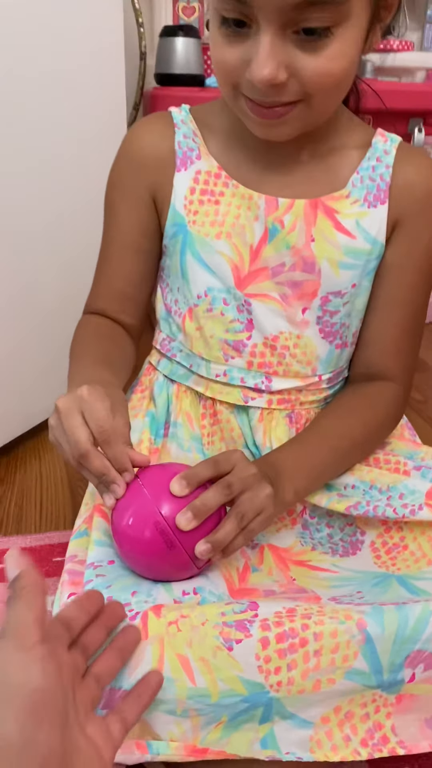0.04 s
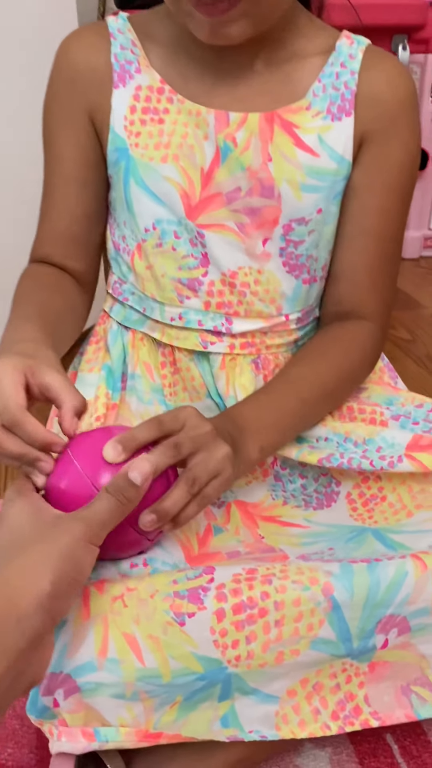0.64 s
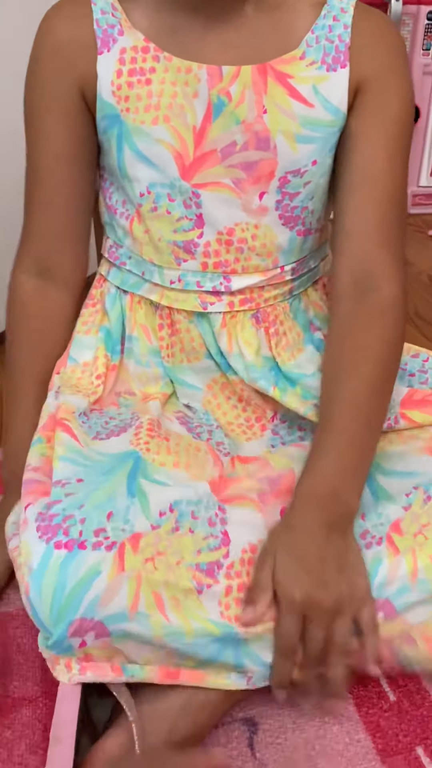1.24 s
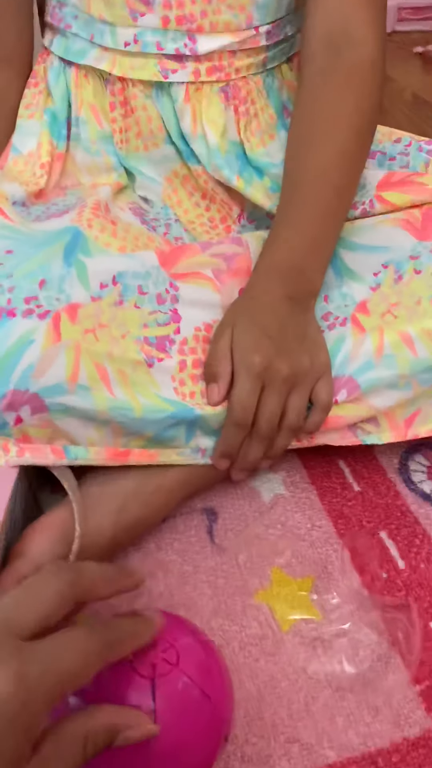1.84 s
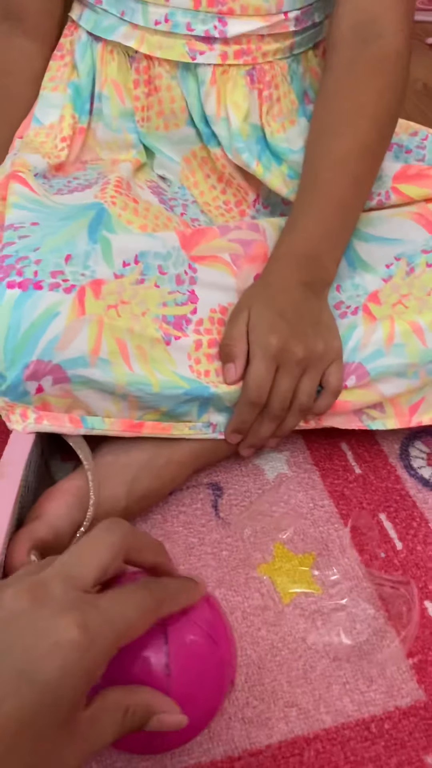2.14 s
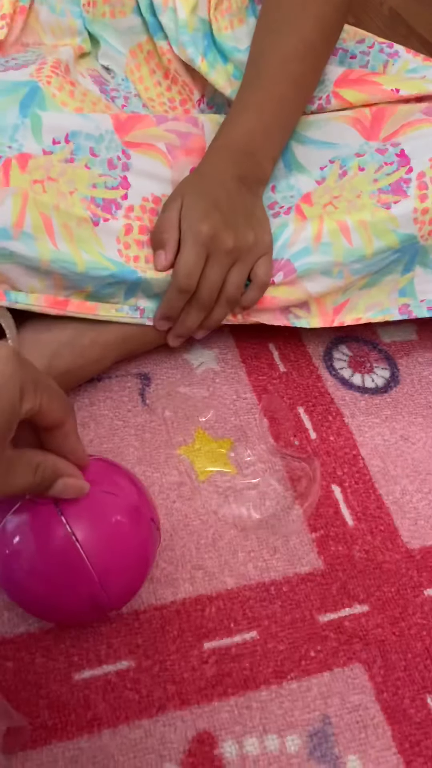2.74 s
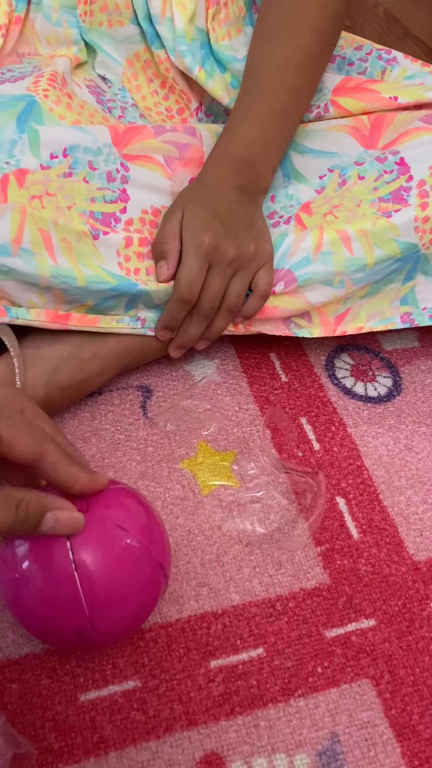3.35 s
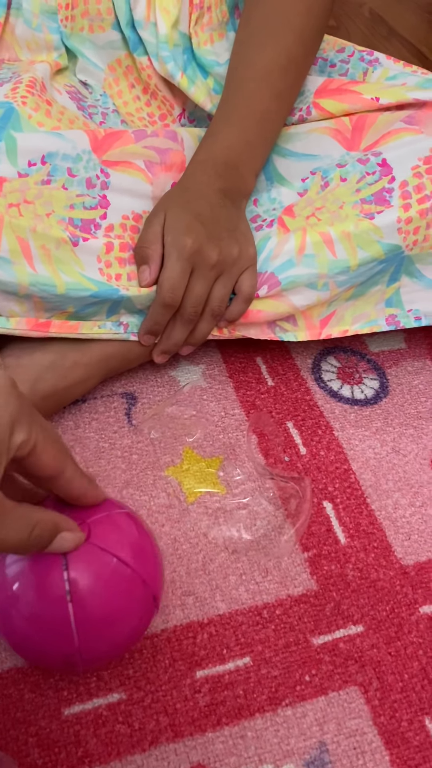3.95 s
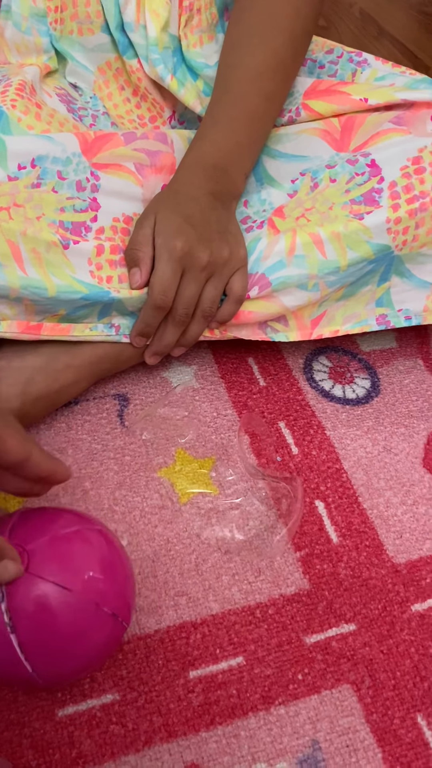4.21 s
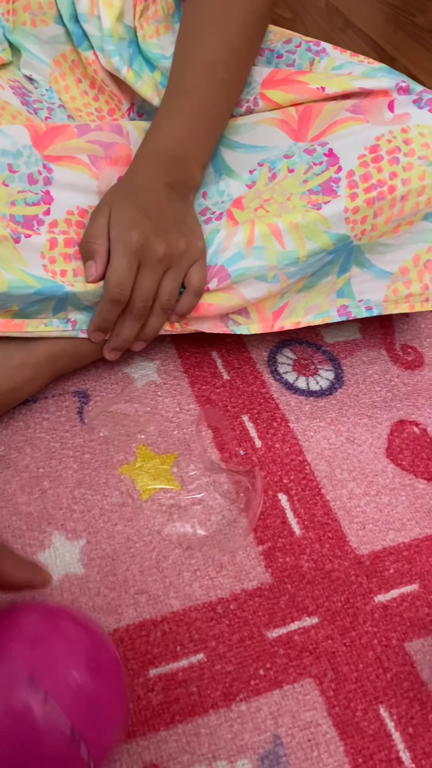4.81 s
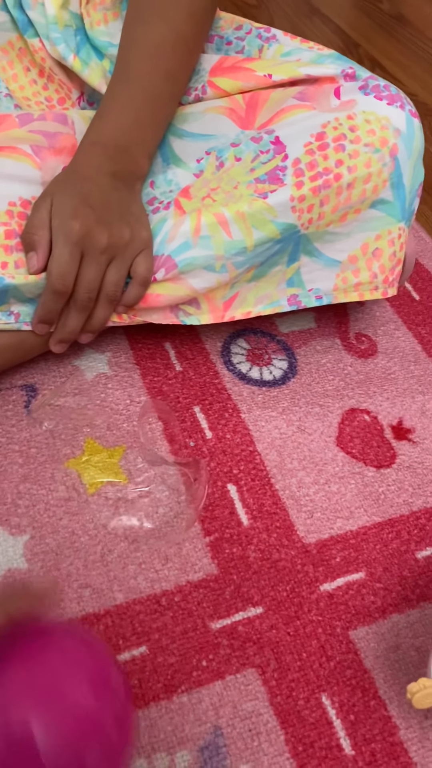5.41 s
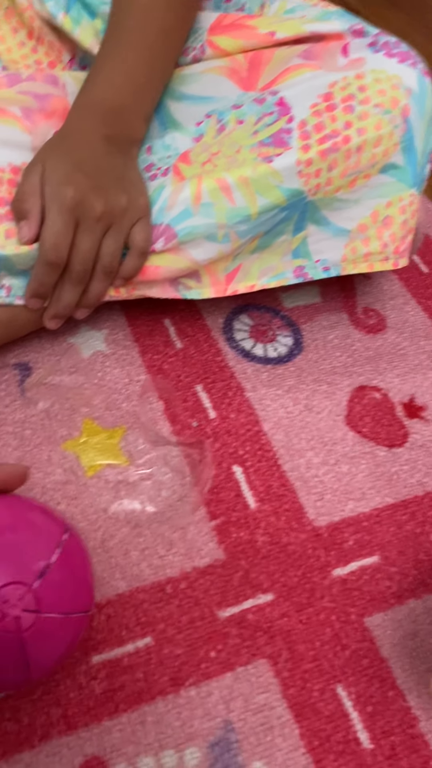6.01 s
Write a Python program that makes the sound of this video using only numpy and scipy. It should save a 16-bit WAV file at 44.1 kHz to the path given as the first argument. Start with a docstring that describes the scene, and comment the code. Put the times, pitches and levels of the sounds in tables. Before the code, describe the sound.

Fingers pick at a hollow plastic toy capsule in a thin wrapper, starting with very faint ticks and rustles and a light tap near 1 second. From about 1.1 to 1.3 seconds, hard plastic clatters once in a quick rattle, slightly to the left; this is the loudest moment. Soft hollow knocks, short scrapes and crisp wrapper clicks follow from 1.4 to 3 seconds as the capsule is turned over a play mat. The handling is sparser until about 4.7 seconds, when a firmer knock starts a busier stretch of rustling, rubbing, knocks and ticks. This eases after 5.6 seconds, with one small knock just before 6. Underneath are a faint rush of room air, a low handling rumble and a faint low hum that rises in pitch at the start and fades away. A hand-held phone hears it all from close by in a small room.

```python
"""Thin wrapper ticks and rustles over a faint rush of air, a low rumble and a rising, fading hum.
Fingers pick at a wrapped, hollow plastic toy capsule and turn it over a play mat in a small room.
Just after a second in, hard plastic clatters once. Soft knocks flex the shell, which also scrapes
over skin and mat; the wrapper's creases snap over. A hand-held phone hears it from close by."""
import sys
import numpy as np
from scipy import signal
from scipy.fft import rfft, irfft, next_fast_len
from scipy.io import wavfile
from scipy.ndimage import uniform_filter1d, map_coordinates

SR = 44100
rng = np.random.default_rng(int(sys.argv[2]) if len(sys.argv) > 2 else 0)


def output_pcm(signal):
    """Save a mono or channel-first signal as 16-bit PCM at the path in sys.argv[1].

    Samples are clipped to [-1, 1] before scaling.
    """
    pcm = np.clip(np.atleast_2d(signal).T, -1, 1) * 32767
    wavfile.write(sys.argv[1], SR, np.round(pcm).astype(np.int16))


N = 267598
TIME = np.arange(N) / SR
TOP_HZ = 16400
FLEX_CYCLES, FLEX_KNEE_HZ = 2.425, 101.7  # bending-wave delay; levels off below the knee
# Spectrum of a plastic snap. Each row: frequency in Hz, relative level in dB.
SNAP_COLOUR = [(800, -16.5), (2500, -5), (4200, -1.5), (4950, -19), (5600, -2), (7500, -4), (10000, 0),
               (14000, -5), (16500, -31.5)]


def amp(db):
    """Decibels to gain."""
    return 10 ** (np.asarray(db) / 20)


def unit(x):
    """Scale to rms 1."""
    return x / np.sqrt(np.mean(x ** 2) + 1e-20)


def blow(x):
    """Scale a short stereo sound to the energy of 10 ms at rms 1."""
    return x * np.sqrt(2 * SR / 100 / np.sum(x ** 2))


def decay(t, t60_s):
    """Exponential fall, 60 dB in t60_s."""
    return np.exp(-np.log(1000) * t / t60_s)


def along(points, hz):
    """Interpolate (Hz, value) points on a log axis."""
    f, v = np.transpose(points)
    return np.interp(np.log(hz + 1), np.log(f + 1), v)


def wobble(knots_per_s):
    """Smooth random curve."""
    return map_coordinates(rng.standard_normal(int(N * knots_per_s / SR) + 4), [TIME * knots_per_s])


def spread(pair, apart):
    """Stereo from a shared signal and a side signal weighted by apart."""
    return np.array([pair[0] + apart * pair[1], pair[0] - apart * pair[1]])


def noise(apart, size=N):
    """Partly correlated stereo white noise."""
    return spread(rng.standard_normal((2, size)), apart)


def filtered(x, response):
    """Apply a complex frequency response."""
    size = next_fast_len(N + SR // 2)
    return irfft(rfft(x, size) * response(np.fft.rfftfreq(size, 1 / SR)), size)[..., :N]


def coloured(x, colour):
    """Apply a (Hz, dB) spectrum; rms 1."""
    return unit(filtered(x, lambda hz: amp(along(colour, hz))))


def impulse(colour, size=2048):
    """Minimum-phase impulse response of a (Hz, dB) spectrum."""
    cepstrum = irfft(np.log(amp(along(colour, np.fft.rfftfreq(size, 1 / SR)))))
    cepstrum[1:size // 2] *= 2
    cepstrum[size // 2 + 1:] = 0
    return irfft(np.exp(rfft(cepstrum)))


def resonance(hz, width):
    """Impulse response of a heavily damped band, a factor 1 + width either side of hz."""
    edges_hz = [hz / (1 + width), min(hz * (1 + width), SR / 2 - 1)]
    band = signal.butter(2, edges_hz, "bandpass", fs=SR, output="sos")
    return signal.sosfilt(band, signal.unit_impulse(SR // 20))


def burst(response, t60_s, apart, rise_s):
    """One contact: a brief noise shudder sounds through an impulse response."""
    t = np.arange(SR // 20) / SR
    envelope = (1 - np.exp(-(t / rise_s) ** 2)) * decay(t, t60_s)
    shudder = noise(apart, len(t)) * envelope
    return blow(signal.fftconvolve(shudder, response[None], axes=1)[:, :len(t)])


def ping(hz, t60_s, rise_s):
    """One damped mode, centred."""
    t = np.arange(SR // 20) / SR
    mode = np.sin(2 * np.pi * (hz * t + rng.random())) * decay(t, t60_s)
    return blow(np.array([mode, mode]) * (1 - np.exp(-(t / rise_s) ** 2)))


def add(track, start_s, sound):
    """Mix a sound into a track."""
    part = track[:, round(start_s * SR):][:, :sound.shape[1]]
    part += sound[:, :part.shape[1]]


def air(level_db=-64):
    """Steady rush of room air."""
    # Each row: frequency in Hz, relative level in dB.
    air_colour = [(40, 8.5), (150, -2.5), (280, 5.5), (400, -25.5), (620, -3), (780, 2), (890, 13),
                  (1050, 3.5), (1400, -8), (2000, -8.5), (3500, -24), (8000, -39.5), (15000, -39)]
    return amp(level_db) * coloured(noise(0.67), air_colour)


def hand_rumble(jolt_s=0.051):
    """The hand holding the phone rumbles; each jolt swells and fades."""
    # Each row: time in seconds, relative level of the steady grip in dB.
    hold = [(0.0, -60.5), (1.52, -57.5), (2.38, -62.5), (4.75, -63.5), (5.44, -58.5), (5.76, -64),
            (6.07, -61)]
    # Each row: peak time in seconds, level in dB.
    jolts = [(0.342, -46), (1.44, -42), (1.769, -50.5), (3.519, -56), (4.12, -57), (5.531, -49)]
    # Each row: frequency in Hz, relative level in dB.
    rumble_colour = [(20, -50.5), (27, -24.5), (36, -5.5), (60, 4.5), (78, 6), (110, -4.5), (160, -13),
                     (300, -30), (600, -68.5)]
    hold_power = amp(np.interp(TIME, *np.transpose(hold)) + 3) ** 2
    jolt_power = sum(amp(db) ** 2 * np.exp(-((TIME - s) / jolt_s) ** 2) for s, db in jolts)
    return np.sqrt(hold_power + jolt_power) * coloured(noise(0.7), rumble_colour)


def hum(start_hz=85.7, end_hz=128.3, glide_s=0.48, start_db=-54.5, fade_db_per_s=10.5):
    """A faint low tone, perhaps a distant motor, rises as it fades."""
    hz = end_hz + (start_hz - end_hz) * np.exp(-TIME / glide_s)
    tone = np.sqrt(2) * np.sin(2 * np.pi * np.cumsum(hz) / SR)
    return amp(start_db - fade_db_per_s * TIME) * tone


def strokes(attack_s=0.026, release_s=0.019):
    """Rustle and rub curves in dB: finger pressure builds, holds and lets go above a resting grip."""
    # Each row: start in seconds, length in seconds, wrapper rustle and rub in relative dB.
    finger_strokes = [(0.08, 0.26, -73, -63.5), (0.37, 0.506, -67.5, -72.5), (0.894, 0.17, -64.5, -56),
                      (1.32, 0.27, -64.5, -61), (1.534, 0.345, -58, -66), (1.882, 0.083, -62, -58.5),
                      (1.979, 0.12, -55, -59.5), (2.176, 0.166, -65, -62.5), (2.357, 0.19, -60, -66),
                      (2.832, 0.228, -58, -66), (3.11, 0.17, -69, -67.5), (3.24, 0.09, -62, -62.5),
                      (3.353, 0.165, -64.5, -66.5), (3.702, 0.2, -63.5, -68), (4.019, 0.075, -66.5, -82),
                      (4.233, 0.1, -68.5, -61), (4.369, 0.13, -65, -81), (4.643, 0.08, -59.5, -67),
                      (4.714, 0.085, -55.5, -53.5), (4.829, 0.11, -59, -61.5), (4.927, 0.27, -55.5, -64),
                      (5.066, 0.064, -46.5, -57), (5.163, 0.157, -59, -66), (5.292, 0.14, -55.5, -62.5),
                      (5.426, 0.087, -54.5, -58.5), (5.53, 0.11, -61, -58.5), (5.918, 0.031, -53.5, -53.5)]
    start_s, length_s, rustle_db, rub_db = np.transpose(finger_strokes)[:, :, None]
    t = TIME[::64]
    attack = np.clip((t - start_s) / attack_s, 0, 1)
    pressure = attack * np.exp(-np.maximum(t - start_s - length_s, 0) / release_s)

    def curve_db(db, resting_db):
        power = np.sum((amp(db) * pressure) ** 2, axis=0) + amp(resting_db) ** 2
        return np.interp(TIME, t, 10 * np.log10(power))

    return curve_db(rustle_db, resting_db=-72.5), curve_db(rub_db, resting_db=-69)


def crackle(grains_per_s=600, centre_hz=4300, reach_octaves=1.7, scatter_db=3):
    """Tiny stick-slip releases of the film, each ringing about two cycles at its own pitch; rms 1."""
    when, size, pitch, lag = rng.random((int(grains_per_s * N / SR), 4)).T[:, :, None]
    hz = np.minimum(centre_hz * 2 ** (reach_octaves * (2 * pitch - 1)), TOP_HZ)
    n = np.arange(SR // 100)
    cycles = hz * n / SR
    strength = amp(-scatter_db * np.log(np.maximum(size, 0.04)))
    envelope = strength * hz * cycles * np.exp(-cycles)
    index = ((when * N).astype(int) + n).ravel()
    pair = [envelope * np.sin(2 * np.pi * cycles + side * lag) for side in (1, -1)]
    return unit(np.array([np.bincount(index, grains.ravel(), N)[:N] for grains in pair]))


def crumple(x, depth_db=3.5):
    """The film changes shape: resonances a few hundred Hz wide come and go in tens of milliseconds."""
    spectra = signal.stft(x, nperseg=512)[2]
    patches = rng.standard_normal(spectra.shape[1:])
    for _ in range(2):
        patches = uniform_filter1d(uniform_filter1d(patches, size=4, axis=0), size=6, axis=1)
    return signal.istft(spectra * amp(depth_db * unit(patches)), nperseg=512)[1][:, :N]


def rustle(rustle_db, firm_db=-52):
    """The sliding wrapper hisses; firmer strokes add more crackle."""
    # Each row: frequency in Hz, relative level in dB.
    wrapper_colour = [(500, -11.5), (1400, 2), (2200, 7), (3000, 1), (4400, 1.5), (5100, -10), (6100, 6),
                      (8000, -5.5), (11000, -1.5), (15000, -2), (16500, -12.5)]
    hiss = unit(noise(0.88))
    crackle_db = 0.6 * np.minimum(rustle_db - firm_db, 0)
    film = crumple(hiss + amp(crackle_db) * crackle())
    pressure_db = 2.3 * wobble(45)
    return coloured(film, wrapper_colour) * amp(rustle_db - 6 + pressure_db)


def rub(rub_db):
    """Dull, uneven friction of fingers on shell and mat."""
    # Each row: frequency in Hz, relative level in dB.
    rub_colour = [(60, -21), (140, 2), (330, -4.5), (600, -7.5), (1200, -5.5), (2200, -36.5), (5000, -51.5)]
    drag_db = 3 * wobble(60)
    return coloured(noise(1), rub_colour) * amp(rub_db + 0.5 + drag_db)


def scrapes(bandwidth_ratio=0.403, slips_per_s=50, slip_db=2):
    """The shell slips over skin and mat, exciting a resonance that glides as the contact moves."""
    # Each row: start in seconds, length in seconds, start and end pitch in Hz, level in dB.
    slides = [(1.361, 0.04, 789, 898, -40), (1.495, 0.03, 1580, 1250, -51.5),
              (1.945, .065, 634, 416, -58.5), (2.051, 0.041, 3090, 3510, -64.5),
              (2.101, 0.013, 800, 480, -56), (2.129, 0.021, 398, 820, -59.5),
              (4.94, 0.078, 1510, 2246, -65), (5.084, 0.064, 1032, 784, -47.5),
              (5.143, 0.0305, 440, 880, -49.5), (5.368, 0.021, 1320, 1280, -48.5),
              (5.496, 0.025, 2740, 2330, -59), (5.497, 0.026, 1038, 500, -45.5)]
    out = np.zeros((2, N))

    def jitter(t, knots_per_s):
        return map_coordinates(rng.standard_normal(SR // 40), [t * knots_per_s], mode="mirror")

    for start_s, length_s, start_hz, end_hz, db in slides:
        progress = np.linspace(0, 1, round(length_s * SR))
        t = progress * length_s
        phase = 2 * np.pi * np.cumsum(start_hz + (end_hz - start_hz) * progress) / SR
        band_hz = bandwidth_ratio * (start_hz + end_hz) / 2
        pair = [jitter(t, band_hz) * np.cos(phase) + jitter(t, band_hz) * np.sin(phase)
                for _ in range(2)]
        envelope = np.sin(np.pi * progress) * amp(slip_db * jitter(t, slips_per_s))
        add(out, start_s, amp(db) * unit(spread(pair, 0.99) * envelope))
    return out


def faint_creases(rustle_db, tries_per_s=14, threshold_db=-67, scatter_db=9, centre_hz=5080):
    """Rows for ticks(): random small creases follow the stroke's strength; light strokes bend none."""
    rows = []
    send_db, treble_db = -7.5, -11.5
    for when, size, pitch in rng.random((int(tries_per_s * N / SR), 3)):
        stroke_db = rustle_db[int(when * N)]
        db = stroke_db - 6.5 + scatter_db * (2 * size - 1)
        if stroke_db > threshold_db:
            rows.append((when * N / SR, db, db, centre_hz * 2 ** (pitch - 0.5), send_db, treble_db))
    return rows


def ticks(rustle_db):
    """Creases snap over and tap the shell beneath; returns direct sound and room send."""
    # Each row: start in seconds, snap and shell in relative dB, crease pitch in Hz,
    # room send and top treble in relative dB.
    loud_creases = [(0.134, -72, -83, 5900, -17, 5), (0.425, -75, -66.5, 5540, -11, 0),
                    (0.753, -58.5, -57, 6430, -15, -8), (0.919, -62.5, -69, 5930, -7, -1),
                    (0.9607, -57.5, -50, 5500, -8, -14), (0.9755, -57, -38, 5470, -15, -19),
                    (1.0103, -55, -65, 4300, -24, -12), (1.033, -53.5, -51, 5960, -11.5, -8),
                    (1.3711, -49.5, -39, 6060, -8.5, -20), (1.377, -57, -44, 3020, -17, -6),
                    (1.4095, -57, -47, 6470, -33, -12), (1.5495, -38, -46.5, 5580, -11.5, -6),
                    (1.6085, -48, -48, 4250, -15, 2), (1.7893, -49, -51, 14000, -22, 8),
                    (1.841, -52.5, -55, 4790, -24, -11), (2.081, -54.5, -51, 4060, -11, 6),
                    (2.25, -65, -57, 3770, 0.5, -25), (2.262, -60.5, -57, 3980, -11, -19),
                    (2.4269, -49.5, -45.5, 5560, -18, 15), (2.458, -60, -71, 6500, -18, 13),
                    (2.5895, -46.5, -50.5, 5560, -10, 0.5), (2.731, -68.5, -64.5, 5800, -3, -4),
                    (2.7885, -57, -49, 4260, -5.5, -17), (2.8168, -40, -47, 7920, -8.5, -1.5),
                    (2.834, -55, -50, 4600, -13, -10), (3.02, -57.5, -71, 3900, -9, -9),
                    (3.098, -49, -54, 7670, -3, -2), (3.1037, -50.5, -46, 6330, -12, -5),
                    (3.109, -54, -54, 3780, -2, -8), (3.178, -61.5, -63, 4400, -16, -7),
                    (3.418, -71, -70, 7200, -12, 4), (3.432, -66, -61, 3800, -12, -5),
                    (3.4868, -58, -44.5, 2380, -32, -4), (3.8255, -49.5, -51, 4710, -13, -11),
                    (3.8335, -53, -54, 3220, -7, -25), (4.118, -59.5, -79, 10100, -11, 0.5),
                    (4.223, -71, -78, 9000, -14, 5), (4.7365, -44, -41, 3730, -18, -16),
                    (4.747, -55, -49, 3800, -7, -8), (5.096, -56, -49, 6700, -13, -4),
                    (5.109, -53.5, -48, 5440, -6, -3), (5.1335, -52, -36.5, 2700, -15.5, -2),
                    (5.178, -58, -69, 4580, -5, -2), (5.191, -54, -60, 2900, -18, 10),
                    (5.239, -73, -54, 3500, -19, 1), (5.3225, -59, -54, 6100, -10, 2),
                    (5.3285, -52, -46, 5900, -7, -3), (5.3735, -50, -52, 2930, -20, -27),
                    (5.4187, -61, -49.5, 7400, -9, -3), (5.4762, -52.5, -56, 4800, -10, 2),
                    (5.4866, -56.5, -50, 12600, 1.5, 2), (5.5722, -42.5, -55, 13200, -18, 14),
                    (5.5765, -49.5, -48.5, 6030, -33, 5), (5.621, -76, -55.5, 4000, -13, -6)]
    # Light tap on the shell. Each row: frequency in Hz, relative level in dB.
    tap_colour = [(400, -16), (900, -4), (1220, -6), (1500, -5.5), (1800, -5), (2150, -3), (2550, -8.5),
                  (3200, -9.5), (5000, -26.5), (9000, -49)]
    out, send = np.zeros((2, 2, N))
    tap = impulse(tap_colour)
    for start_s, snap_db, shell_db, hz, send_db, treble_db in loud_creases + faint_creases(rustle_db):
        # A sharp crease is bright, a blunt one dull; its size sets the pitch.
        snap = impulse([(f, db + treble_db * np.clip(f / 5000 - 1, 0, 1)) for f, db in SNAP_COLOUR])
        crack = amp(snap_db - 0.5) * burst(snap, t60_s=0.005, apart=0.5, rise_s=0.0017)
        crease = amp(snap_db - 3) * burst(resonance(hz, 0.16), t60_s=0.007, apart=0.4, rise_s=0.0017)
        tone = amp(snap_db - 6) * ping(hz, t60_s=0.012, rise_s=0.001)
        shell = amp(shell_db - 4) * burst(tap, t60_s=0.014, apart=0.5, rise_s=0.0017)
        click = crack + crease + tone + shell
        add(out, start_s, click)
        add(send, start_s, amp(send_db - 4) * click)
    return out, send


def flex(response):
    """Bending wave round the shell: treble arrives first, so a knock swoops down."""
    size = SR // 10
    hz = np.fft.rfftfreq(size, 1 / SR)
    lag_rad = 2 * np.pi * FLEX_CYCLES * np.log1p(hz / FLEX_KNEE_HZ)
    wave = irfft(rfft(response, size) * np.exp(-1j * lag_rad), size)[:size // 2]
    return blow(np.array([wave, wave]))


def knocks(hollow_hz=155):
    """Fingers and mat flex the shell: a clack swoops into a thud, then the hollow booms briefly."""
    # Each row: start in seconds, nominal pitch in Hz, thud and shell in relative dB.
    contacts = [(0.9751, 680, -55, -39.5), (1.3667, 700, -36.5, -56), (1.3732, 508, -39.5, -58),
                (1.409, 480, -41, -46), (1.501, 1700, -48, -61), (1.9012, 400, -52, -55.5),
                (1.991, 486, -48, -72), (2.1169, 444, -41, -43.5), (2.187, 480, -51, -54.5),
                (2.2992, 527, -40.5, -43), (2.513, 497, -53, -55), (2.8138, 726, -53, -69),
                (3.487, 483, -44, -44), (4.117, 340, -37.5, -75), (4.7324, 322, -33.5, -33.5),
                (4.738, 310, -34, -68), (4.767, 504, -41, -73), (4.8122, 372, -36, -53.5),
                (5.065, 306, -38, -49), (5.1087, 370, -36, -47), (5.123, 272, -46, -49),
                (5.1317, 543, -33, -34.5), (5.287, 400, -50.5, -67), (5.3725, 1650, -59, -64),
                (5.401, 358, -48, -62), (5.4628, 402, -65, -57), (5.501, 770, -42, -58),
                (5.514, 497, -42, -44.5), (5.936, 469, -48, -50)]
    # Fingertip on the shell. Each row: frequency in Hz, relative level in dB.
    clack_colour = [(300, -18.5), (800, 7), (1200, -0.5), (1600, -1.5), (2050, -9.5), (2500, -12),
                    (3200, -18.5), (5000, -22), (9000, -43.5)]
    out = np.zeros((2, N))
    clack = flex(impulse(clack_colour))
    for start_s, hz, thud_db, shell_db in contacts:
        body = resonance(0.85 * hz, 0.8)
        shudder = burst(body, t60_s=0.04, apart=0.7, rise_s=0.004)
        boom = burst(resonance(hollow_hz, 0.65), t60_s=0.039, apart=0.3, rise_s=0.002)
        add(out, start_s, amp(thud_db - 6.5) * flex(body) + amp(shell_db - 3.5) * clack)
        add(out, start_s, amp(thud_db - 10) * shudder)
        add(out, start_s + FLEX_CYCLES / hz, amp(thud_db - 11.5) * boom)
    return out


def ring(detune=0.004, scatter_db=3, rise_s=0.0011):
    """Modes of the struck plastic; pitch and strength vary from hit to hit."""
    # Each row: frequency in Hz, relative level in dB, t60 in seconds.
    plastic_modes = [(179, -17, 0.23), (283, -14, 0.94), (620.3, 5, 0.27), (670, -2, .2), (797, -2.5, .18),
                     (1050, -8.5, .3), (1233, 1, 0.23), (1383, 4.5, .22), (1480, 1, 0.15), (1595, -5, 0.12),
                     (1820, -1.5, 0.28), (2470, -10, .14), (5600, -10, .08)]
    t = np.arange(SR // 2) / SR
    hz, db, t60_s = np.transpose(plastic_modes)[:, :, None]
    hz = hz * np.exp(detune * rng.standard_normal(hz.shape))
    strength = amp(db + scatter_db * rng.standard_normal((2, len(hz), 1)))
    phase = 2 * np.pi * rng.random(strength.shape)
    modes = strength * np.sin(2 * np.pi * hz * t + phase) * decay(t, t60_s)
    return blow(spread(modes.sum(axis=1), 0.41) * (1 - np.exp(-t / rise_s)))


def clatter():
    """Hard plastic strikes and rattles, slightly left; each contact has its own clack and rim pitch."""
    # Each row: start in seconds; low push, body, shell and snap in relative dB;
    # clack pitch in Hz, rim in relative dB, rim pitch in Hz.
    contacts = [(1.1233, -48, -48, -42.5, -53.5, 1400, -58, 4120),
                (1.1322, -41, -44.5, -24, -27, 1520, -31, 5570),
                (1.1431, -40, -34, -37.5, -50.5, 1500, -49.5, 4440),
                (1.1488, -43.5, -38.5, -31.5, -48, 1750, -32, 3810),
                (1.1554, -49, -33, -30.5, -35.5, 1500, -39, 5900),
                (1.171, -45.5, -38.5, -36, -50.5, 1600, -52.5, 4460),
                (1.1916, -59, -51, -42.5, -36.5, 1900, -44.5, 5570),
                (1.2017, -41.5, -39.5, -27.5, -46.5, 1480, -35, 3630),
                (1.2131, -51.5, -56.5, -36, -40.5, 1500, -45, 6140),
                (1.2255, -58, -44.5, -45.5, -44, 1750, -40, 3900),
                (1.242, -41.5, -45.5, -38.5, -44, 1400, -65, 4300),
                (1.255, -49.5, -45, -48.5, -53, 1650, -51, 4600),
                (1.267, -44.5, -41.5, -47, -46, 1950, -50, 4240),
                (1.287, -53, -52.5, -48.5, -50, 1300, -55, 4000)]
    # Hard hit on the shell. Each row: frequency in Hz, relative level in dB.
    shell_colour = [(400, -26.5), (900, -16), (1220, -3), (1380, -8.5), (1560, -0.5), (1850, -5.5),
                    (2200, 0.5), (2900, -18.5), (4000, -11.5), (4800, -37), (5700, -28.5), (9000, -40.5)]
    out = np.zeros((2, N))
    shell, snap = impulse(shell_colour), impulse(SNAP_COLOUR)
    pan = amp([[2.5], [-2.5]])
    for start_s, push_db, body_db, shell_db, snap_db, clack_hz, rim_db, rim_hz in contacts:
        body = burst(resonance(670, 0.32), t60_s=0.04, apart=1, rise_s=0.003)
        push = burst(resonance(190, 0.57), t60_s=0.02, apart=0.16, rise_s=0.0029)
        clack = amp(-3) * burst(shell, t60_s=0.013, apart=0.1, rise_s=0.002)
        clack += ping(clack_hz, t60_s=0.008, rise_s=0.0025)
        rim = amp(-2) * burst(resonance(rim_hz, 0.18), t60_s=0.008, apart=0.3, rise_s=0.002)
        rim += amp(-4) * ping(rim_hz, t60_s=0.012, rise_s=0.002)
        add(out, start_s, pan * (amp(body_db + 1.5) * body + amp(shell_db - 2) * clack))
        add(out, start_s, pan * amp(body_db - 4) * ring())
        crack = burst(snap, t60_s=0.006, apart=0.4, rise_s=0.0014)
        add(out, start_s, amp(push_db) * push + amp(rim_db) * rim + amp(snap_db + 1.5) * crack)
    return out


def room(x, gap_s=0.0072):
    """The walls answer after a short gap; treble dies first."""
    # Each row: frequency in Hz, t60 in seconds.
    reverb_times = [(150, 0.38), (700, 0.3), (2000, 0.29), (6000, 0.26), (15000, 0.061)]
    hz, t, spectra = signal.stft(rng.standard_normal((2, SR * 3 // 4)), SR, nperseg=256)
    tail = signal.istft(spectra * decay(t, along(reverb_times, hz)[:, None]), SR, nperseg=256)[1]
    tail = np.pad(spread(tail, 0.91), ((0, 0), (round(gap_s * SR), 0)))
    return signal.fftconvolve(x.mean(axis=0)[None], tail / np.linalg.norm(tail[0]), axes=1)[:, :N]


def scene():
    """All sources; only contacts and ticks excite the room."""
    rustle_db, rub_db = strokes()
    bed = rustle(rustle_db) + rub(rub_db) + air() + hand_rumble() + hum()
    hard = clatter()
    soft = knocks() + scrapes()
    wrapper, send = ticks(rustle_db)
    walls = room(amp(-8) * hard + amp(-11.5) * soft + amp(5) * send)
    return bed + hard + soft + wrapper + walls


def record(dry):
    """The phone's microphone pair shifts width, phase and level between channels, then low-passes."""
    # Each row: frequency in Hz, relative side level in dB.
    width_db = [(60, -25.5), (150, -7.5), (400, -2), (1500, -5), (5500, 2), (8000, -18), (11000, -19),
                (14000, 2)]
    # Each row: frequency in Hz, left over right in dB.
    balance_db = [(200, 0), (400, -2), (700, 4.5), (1400, 2), (2400, 0), (15000, 0)]
    # Each row: frequency in Hz, phase lead of the left in radians.
    lead_rad = [(20, 0), (260, 0), (600, 1.7), (1100, 2.4), (1700, 1.3), (2800, 3.2), (5400, 3.4),
                (6200, 1.9), (7800, 2.65), (9200, 3.05), (11000, 3.2), (12200, 3.5), (13700, 4.3),
                (15500, 5.7)]
    halves = np.array([[0.5], [-0.5]])

    def ports(hz):
        return amp(halves * along(balance_db, hz)) * np.exp(1j * halves * along(lead_rad, hz))

    mid = (dry[0] + dry[1]) / 2
    side = filtered((dry[0] - dry[1]) / 2, lambda hz: amp(along(width_db, hz)))
    pair = filtered(spread([mid, side], 0.88), ports)
    return filtered(pair, lambda hz: 1 / np.sqrt(1 + (hz / TOP_HZ) ** 160))


dry = scene()
out = record(dry)
output_pcm(out)
```